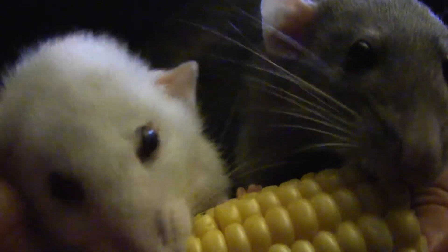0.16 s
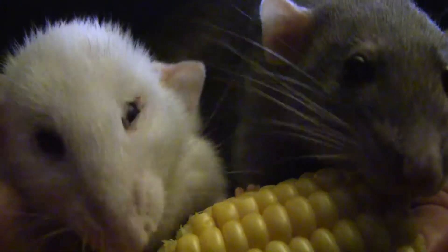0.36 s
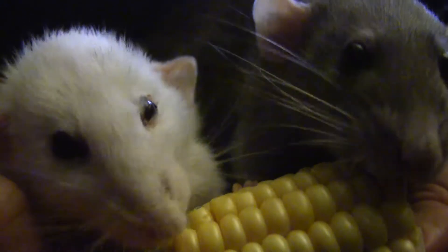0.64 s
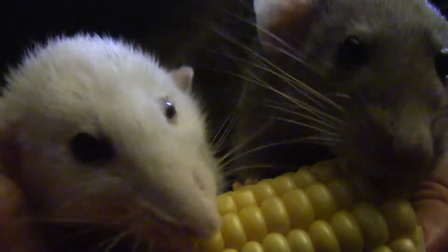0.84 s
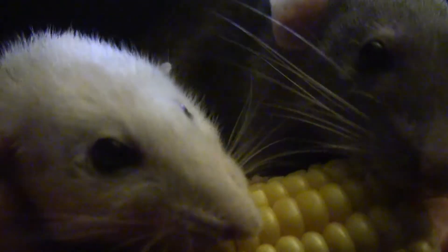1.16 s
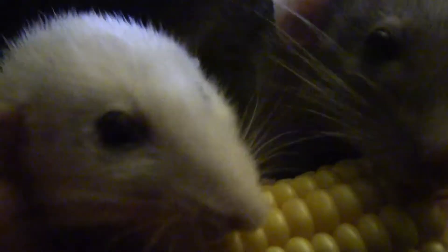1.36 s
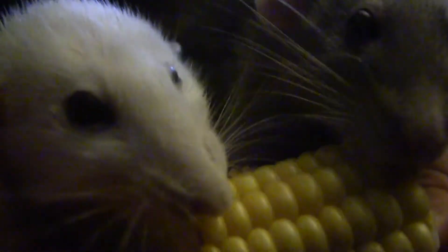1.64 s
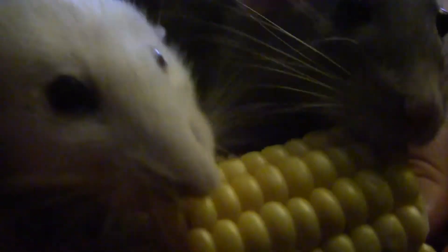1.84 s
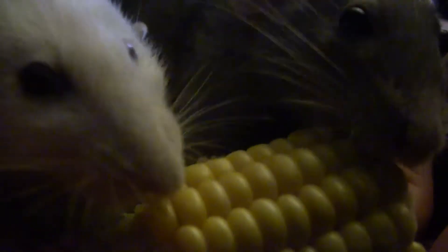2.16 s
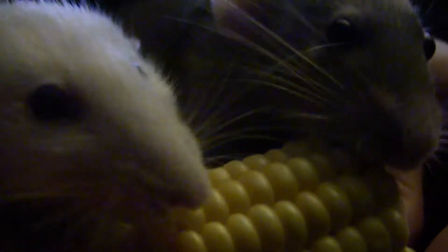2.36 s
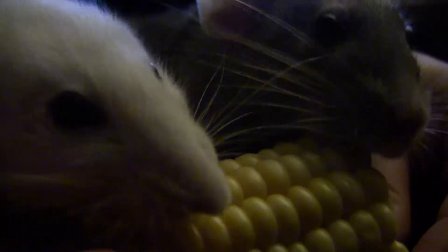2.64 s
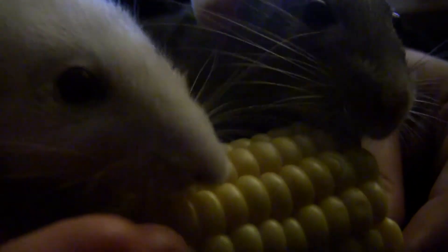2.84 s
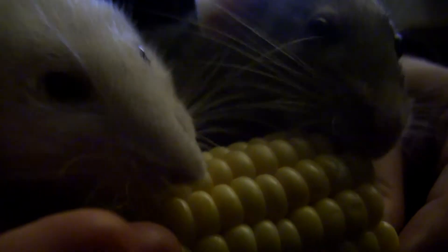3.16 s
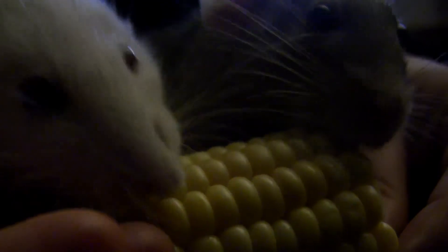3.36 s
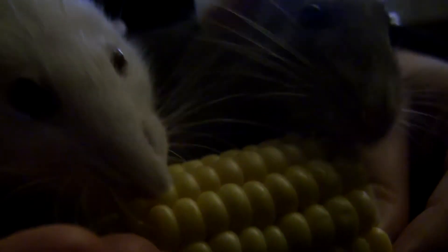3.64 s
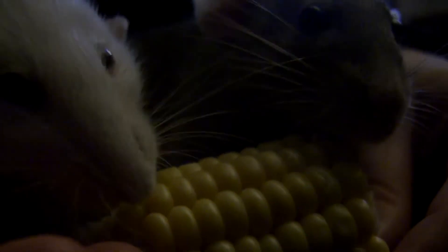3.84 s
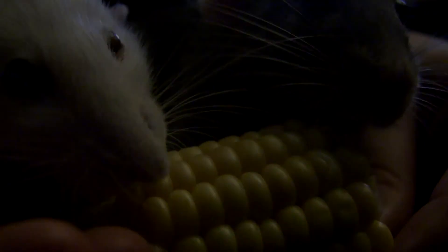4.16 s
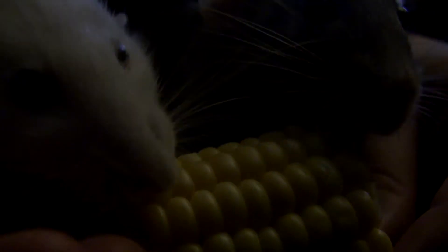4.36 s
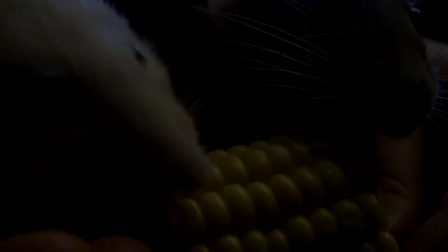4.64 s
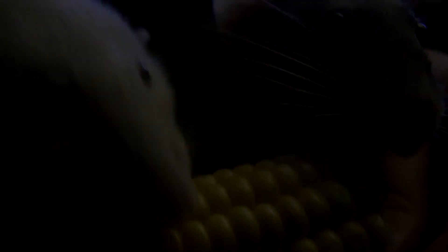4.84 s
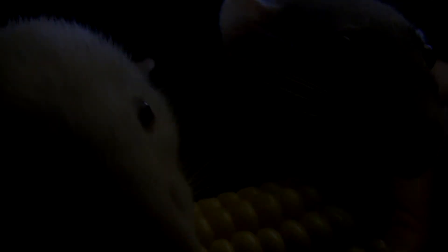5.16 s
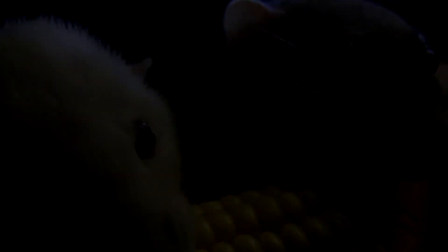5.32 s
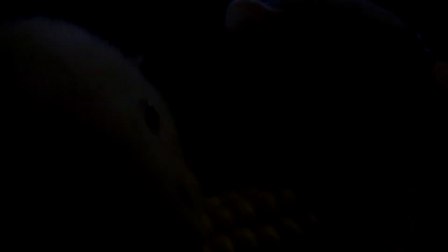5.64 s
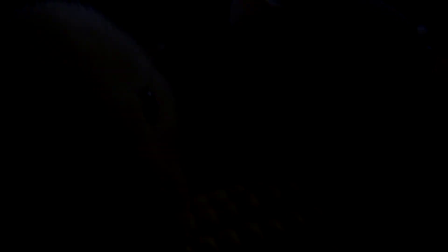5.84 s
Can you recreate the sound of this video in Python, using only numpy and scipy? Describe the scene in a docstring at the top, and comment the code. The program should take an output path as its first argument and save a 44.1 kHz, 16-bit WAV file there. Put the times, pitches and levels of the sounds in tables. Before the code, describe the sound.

Extreme close-up gnawing: brittle ticks of incisors through kernel skins, some over a dull little crack, mixed with moist crunches and tiny falling pops. Lighter nips patter underneath. Busy for about three seconds, then looser and quieter. A short, soft, sinking rub passes near the end. Very dry small-room sound with faint hum and background noise that fade away.

```python
"""Two rats gnawing a corn cob

Two rats gnaw kernels off a hand-held corn cob, close to the microphone in a quiet room.
Incisors snap through skins (short rings over a dull crack) and bites tear pulp in bursts of tiny clicks.
Juice pops as falling sines; fine nibbling (a fizz of clicks) and random lighter nips run underneath.
Near the end something soft brushes past as a sinking noise band under a wide hiss; the mains hums faintly as a sine.
"""
import sys
import numpy as np
from scipy import signal
from scipy.fft import rfft, irfft
from scipy.io import wavfile

SR = 44100
rng = np.random.default_rng(int(sys.argv[2]) if len(sys.argv) > 2 else 0)


def int16_out(signal):
    """Quantize to a 16-bit WAV file."""
    q = np.round(np.clip(np.atleast_2d(signal).T, -1, 1) * 32767)
    wavfile.write(sys.argv[1], SR, q.astype(np.int16))


N = 263938
GRAIN_HZ = np.geomspace(700, 14500, 22)   # the pitches that the crackle is built from


def from_db(db):
    """Decibels to an amplitude factor."""
    return 10 ** (np.asarray(db) / 20)


def rms_one(x):
    """Scales a sound to rms 1."""
    return x / np.sqrt(np.mean(x ** 2) + 1e-20)


def in_time(rows):
    """One curve per column, joined by straight lines."""
    s, *columns = np.transpose(rows)
    return [np.interp(np.arange(N) / SR, s, c) for c in columns]


def at_hz(points, hz):
    """Reads a spectrum on a log-frequency axis."""
    points_hz, points_db = np.transpose(points)
    return np.interp(np.log(hz + 1e-9), np.log(points_hz), points_db)


def add(track, s, sound):
    """Mixes a short sound in at time s."""
    at = int(np.clip(round(s * SR), 0, N - 1))
    track[..., at:at + sound.shape[-1]] += sound[..., :N - at]


def cut(x, hz, kind, order):
    """Butterworth high- or low-pass."""
    sos = signal.butter(order, min(hz, SR / 2 - 1000), kind, fs=SR, output="sos")
    return signal.sosfilt(sos, x)


def resonate(x, hz, width_hz):
    """One resonance, gain about 1 on top."""
    r = np.exp(-np.pi * width_hz / SR)   # pole radius
    zeros = np.array([1, 0, -1]) * (1 - r * r) / 2
    poles = [1, -(1 + r * r) * np.cos(2 * np.pi * hz / SR), r * r]
    return signal.lfilter(zeros, poles, x + 1e-18)


def panned(x, pan_db):
    """Left is louder than right by pan_db."""
    return x * from_db(np.array([[.5], [-.5]]) * pan_db)


def drift(hz):
    """Slow chance that changes up to about hz times a second; spread about 1, held within 2."""
    return np.clip(rms_one(cut(rng.standard_normal(N), hz, "low", order=2)), -2, 2)


def wander(depth_db, hz):
    """An uneven gain that changes up to about hz times a second."""
    return from_db(depth_db * drift(hz))


def coloured_noise(spectrum, side_db):
    """Stereo noise of a given spectrum; the middle has rms about 1."""
    gain = from_db(at_hz(spectrum, np.arange(N // 2 + 1) * SR / N))
    mid, side = rms_one(irfft(rfft(rng.standard_normal((2, N))) * gain, N))
    return mid + from_db(side_db) * side * [[1], [-1]]


# Mains hum: t/s, level/dB (rms, before it wavers)
HUM_LEVEL = [(0, -57.5), (2.2, -59), (4, -63), (6, -73)]


def mains_hum(hum_hz=119.9):
    """Mains hum is one steady tone, here with an unsteady level."""
    level = from_db(in_time(HUM_LEVEL)[0]) * wander(2.5, 5)
    return level * np.sqrt(2) * np.sin(2 * np.pi * hum_hz * np.arange(N) / SR)


# Colour of the background noise: f/Hz, level/dB (per Hz, relative)
NOISE_COLOUR = [(25, -17), (70, -16.5), (140, -3), (260, 0), (450, 1.5), (750, 0), (1100, -5), (2000, -6),
                (5000, -3), (16000, -16)]


def background_noise(noise_db):
    """The faint background is wide, coloured noise whose level wavers."""
    noise = panned(coloured_noise(NOISE_COLOUR, side_db=-1.5), pan_db=-2.5)
    return from_db(noise_db + 2.5) * wander(3.0, 25.0) * noise


def reflections(x, level_db, t60_s, size=8192):
    """Diffuse scatter that dies away, different at each ear."""
    tail = rng.standard_normal((2, size)) * from_db(-60 * np.arange(size) / SR / t60_s)
    tail /= np.linalg.norm(tail, axis=1, keepdims=True)
    return from_db(level_db) * signal.oaconvolve(x, tail, axes=1)[:, :N]


# Hollow between cob, hands and muzzles: f/Hz (centre, before the heads move), width/Hz, level/dB
HOLLOW = [(2735, 540, -0.5), (4290, 600, 2), (6850, 590, -3), (10450, 3200, -5.5)]


def hollow(x, low_hz, top_hz, shift_octaves, shift_hz):
    """The space round the muzzles lifts broad resonances that shift with the heads; fur dulls the top."""
    pose = np.clip(drift(shift_hz), -1, 1)
    lifted = np.zeros_like(x)
    for k in (-1, 0, 1):   # crossfade between three head poses
        posed = x * np.maximum(1 - np.abs(pose - k), 0)
        for hz, width_hz, db in HOLLOW:
            lifted += from_db(db) * resonate(posed, hz * 2 ** (k * shift_octaves), width_hz)
    return cut(cut(x + lifted, low_hz, "high", order=2), top_hz, "low", order=3)


def smear(x, hz, width_hz):
    """An all-pass: partials around hz arrive a little late, which spreads each click."""
    return x - 2 * resonate(x, hz, width_hz)


# The brush swells, sags and lifts off
BRUSH_AT_S, BRUSH_LENGTH_S, BRUSH_DB = 5.589, 0.072, -38.5
BRUSH_EDGE_DB_PER_S, BRUSH_SAG_DB_PER_S = 900, 173
# Its rub is a sinking band of noise with a slightly louder, wide hiss over it
RUB_FIRST_HZ, RUB_LAST_HZ, RUB_SPREAD_HZ, BRUSH_HISS_DB = 385, 185, 99, 1.5
# Colour of the brush hiss: f/Hz, level/dB (per Hz, relative)
BRUSH = [(70, -26), (140, -11), (600, 2), (1200, -5), (6000, -19)]


def brushing():
    """Something soft lands on the cob, loses pressure and lifts off; its rub sinks in pitch as it slows."""
    t = np.arange(N) / SR - BRUSH_AT_S
    sliding_s = np.clip(t, 0, BRUSH_LENGTH_S)
    outside_s = np.abs(t - sliding_s)
    db = BRUSH_DB - BRUSH_SAG_DB_PER_S * sliding_s - BRUSH_EDGE_DB_PER_S * outside_s
    hz = RUB_FIRST_HZ * (RUB_LAST_HZ / RUB_FIRST_HZ) ** (sliding_s / BRUSH_LENGTH_S)
    turn = 2 * np.pi * np.cumsum(hz) / SR
    # slow noise on both phases makes a noise band around the sinking pitch
    band = drift(RUB_SPREAD_HZ) * np.cos(turn) + drift(RUB_SPREAD_HZ) * np.sin(turn)
    rub = rms_one(cut(band, RUB_LAST_HZ, "high", order=2))
    return from_db(db) * (rub + from_db(BRUSH_HISS_DB) * coloured_noise(BRUSH, side_db=-7))


def kernel(x, hz, width_hz, edge_hz):
    """Tooth and kernel ring briefly, and are too small to radiate low notes."""
    return cut(resonate(x, hz, width_hz), edge_hz, "high", order=3)


def fractures(per_s, spread_db, scatter_db):
    """Cell walls break at random: many small clicks, a few large, each from its own direction."""
    when, strength, sign, side = rng.random((int(per_s * N / SR) + 1, 4)).T
    size = from_db(-spread_db * np.log(0.017 + strength)) * np.sign(sign - .5)
    clicks = np.zeros((2, N))
    clicks[:, (when * N).astype(int)] = panned(size, scatter_db * (2 * side - 1))
    return clicks


def grains(hz, per_s, spread_db):
    """The fractures of one pitch, each a tick of a few cycles; rms 1."""
    clicks = fractures(per_s / len(GRAIN_HZ), spread_db, scatter_db=-2.5)
    return rms_one(kernel(clicks, hz, 0.22 * hz, 0.57 * hz))


# Fizz of wet pulp: f/Hz, level/dB (per Hz, relative)
PULP = [(700, -11), (1400, -8.5), (2800, -3.5), (4300, -1.75), (7000, 0.5), (11000, -1.5), (14500, 0.5)]


def shares(colour_db):
    """How the crackle is shared among the grain pitches; unit power in all."""
    gain = from_db(at_hz(PULP, GRAIN_HZ) + colour_db) * np.sqrt(GRAIN_HZ)
    return gain / np.linalg.norm(gain)


def nibbling(level_db, flutter_db, flutter_hz, tilt_db):
    """Small, uneven jaw movements keep up a wet fizz with stray ticks in it."""
    fizz = np.zeros((2, N))
    for share, hz in zip(shares(tilt_db * np.log2(GRAIN_HZ)), GRAIN_HZ):
        dense = from_db(-3.5) * grains(hz, per_s=14000, spread_db=2.0)
        stray = from_db(-5.5) * grains(hz, per_s=260, spread_db=5.0)
        fizz += share * (dense + stray)
    return from_db(level_db) * wander(flutter_db, flutter_hz) * fizz


# Lighter nips: rate, level relative to the nibbling, scatter of level, range and width of the ring
NIPS_PER_S, NIP_DB, NIP_SPREAD_DB = 28, 19.5, 4.5
NIP_LOW_HZ, NIP_HIGH_HZ, NIP_WIDTH_HZ = 4040, 13300, 5100


def nips(nibble_db, size=160):
    """Rows of lighter snaps at random moments; their strength follows the nibbling."""
    wait, strength, pitch = rng.random((size, 3)).T
    s = np.cumsum(-np.log(1 - wait)) / NIPS_PER_S
    followed_db = np.interp(s * SR, np.arange(N), nibble_db)
    db = followed_db + NIP_DB + NIP_SPREAD_DB * (2 * strength - 1)
    hz = NIP_LOW_HZ * (NIP_HIGH_HZ / NIP_LOW_HZ) ** pitch
    rows = np.column_stack([s, db, hz, np.full(size, NIP_WIDTH_HZ), hz / 2])
    return rows[s < N / SR]


# Wet pops that fall in pitch: t/s, level/dB (relative), first f/Hz, last f/Hz, length/s
POPS = [(0.168, -21.5, 2170, 1450, 0.008), (0.849, -27, 3960, 2160, 0.0043),
        (0.967, -29.5, 2560, 1465, 0.0069), (1.358, -28, 3200, 800, 0.0033),
        (2.513, -28, 2490, 1120, 0.0051), (3.4136, -12.5, 2200, 1250, 0.0019),
        (3.4154, -11.5, 820, 358, 0.0031), (3.554, -20.5, 2850, 1000, 0.0015),
        (3.613, -21, 2500, 514, 0.0012), (3.7122, -30, 560, 480, 0.0069), (3.891, -28, 2450, 610, 0.0033),
        (4.003, -38.5, 1510, 446, 0.007), (4.579, -26, 2240, 905, 0.0027), (4.779, -21, 3400, 1280, 0.0022),
        (5.908, -32, 2870, 2200, 0.0011)]


def pops(glide_s, attack_s, rough, low_hz, pan_db, size=1500):
    """A wet seal breaks and the opening pocket rings, its pitch dropping at once."""
    out, t = np.zeros(N), np.arange(size) / SR
    for s, db, first_hz, last_hz, length_s in POPS:
        hz = last_hz * (first_hz / last_hz) ** np.exp(-t / glide_s)
        shape = (1 - np.exp(-t / attack_s)) * np.exp(-(t / length_s) ** 2)
        # the wet film flutters as it parts
        flutter = rms_one(cut(rng.standard_normal(size), 1460, "low", order=2))
        shape = shape * (1 + rough * flutter)
        add(out, s, from_db(db) * shape * np.sin(2 * np.pi * np.cumsum(hz) / SR))
    return panned(cut(out, low_hz, "high", order=2), pan_db)


# Bites tearing the pulp, timed at the hardest push:
# t/s, build-up/s, easing/s, level/dB (relative), ring f/Hz, tilt/dB per octave
BITES = [(0.027, 0.024, 0.0028, -23, 9300, -2), (0.168, 0.0029, 0.026, -31.5, 14000, -4.5),
         (0.391, 0.076, 0.013, -32.5, 3340, 5), (0.547, 0.0063, 0.0035, -20.5, 3900, 5.5),
         (0.619, 0.006, 0.1, -23.5, 4630, 4), (0.697, 0.0045, 0.022, -31.5, 12200, -4.5),
         (0.811, 0.031, 0.026, -26, 4160, 2.5), (0.903, 0.003, 0.0053, -27, 10500, -3),
         (1.131, 0.027, 0.045, -23, 8000, -0.5), (1.21, 0.014, 0.0034, -19.5, 3340, 1.5),
         (1.271, 0.017, 0.05, -30.5, 3500, 3), (1.312, 0.0029, 0.021, -17.5, 11600, 0.5),
         (1.445, 0.003, 0.016, -32, 5000, 0), (1.484, 0.007, 0.015, -26.5, 13600, -3),
         (1.525, 0.006, 0.007, -31.5, 3300, 0), (1.652, 0.0054, 0.012, -27, 12300, -2),
         (1.722, 0.0087, 0.0037, -26.5, 10800, 7), (1.891, 0.017, 0.0057, -26, 6400, -1),
         (2.079, 0.032, 0.0085, -25, 4300, 0), (2.149, 0.016, 0.0048, -27, 8200, 7),
         (2.263, 0.041, 0.023, -29, 6400, 3.5), (2.335, 0.0078, 0.0033, -19, 2400, 9),
         (2.449, 0.014, 0.0047, -18, 5100, 2), (2.473, 0.0067, 0.0041, -19, 4900, 3),
         (2.71, 0.002, 0.028, -25.0, 11500, -0.5), (2.791, 0.0076, 0.0037, -26.5, 8900, -2),
         (2.995, 0.008, 0.024, -23.5, 2600, 3.5), (3.1, 0.072, 0.005, -25.5, 2750, 2.5),
         (3.137, 0.015, 0.0092, -23, 12000, 0), (3.335, 0.027, 0.012, -35, 11400, -5),
         (3.405, 0.02, 0.041, -34.5, 10100, -3), (3.621, 0.022, 0.0084, -34.5, 10400, -3),
         (3.762, 0.0029, 0.017, -22, 6070, -0.5), (3.893, 0.0035, 0.0029, -24, 2000, -0.5),
         (4.038, 0.01, 0.015, -23.5, 5750, -1), (4.108, 0.002, 0.0076, -24, 11800, 1.5),
         (4.215, 0.022, 0.045, -30.5, 4060, -0.5), (4.335, 0.024, 0.016, -33, 4200, 3),
         (4.401, 0.021, 0.003, -30, 9100, -3), (4.497, 0.042, 0.022, -31, 4170, 0),
         (4.579, 0.008, 0.0017, -28.5, 2700, -5.5), (4.609, 0.015, 0.016, -28.5, 2800, 3),
         (4.677, 0.022, 0.0079, -33, 4030, -1), (4.809, 0.025, 0.0063, -31.5, 9500, -2),
         (4.836, 0.0012, 0.063, -35, 5100, 4), (4.976, 0.038, 0.003, -32.5, 1950, 0),
         (5.046, 0.0094, 0.012, -33, 3920, 2), (5.117, 0.011, 0.0023, -23, 7900, 0.5),
         (5.134, 0.0046, 0.0063, -25, 3020, 1), (5.263, 0.041, 0.0051, -31.5, 4050, 4.5),
         (5.352, 0.006, 0.026, -31.5, 7650, 1.5), (5.411, 0.021, 0.0093, -33, 6550, 2.5),
         (5.446, 0.01, 0.0062, -34, 7600, 0), (5.492, 0.005, 0.024, -28.5, 4700, 10.5),
         (5.624, 0.04, 0.013, -28.5, 2280, 0.5), (5.782, 0.004, 0.018, -33.5, 3180, 3),
         (5.971, 0.019, 0.01, -29, 9300, 1.5)]


def bites(level_db, judder_db, judder_hz, ring_db, ring_octaves, size=16384):
    """The push builds until the pulp gives, then eases; each bite crackles around a pitch of its own."""
    power, t = np.zeros((len(GRAIN_HZ), N)), np.arange(size) / SR
    for s, build_s, ease_s, db, hz, tilt_db in BITES:
        start = max(s - 3 * build_s, 0)
        since = t + start - s
        push = np.exp(-np.where(since < 0, (since / build_s) ** 2, since / ease_s))
        octaves = np.log2(GRAIN_HZ / hz)
        colour_db = tilt_db * octaves + ring_db * np.exp(-(octaves / ring_octaves) ** 2)
        add(power, start, np.outer(shares(colour_db) ** 2, (from_db(db + level_db) * push) ** 2))
    tearing = np.zeros((2, N))
    for grain_power, hz in zip(power, GRAIN_HZ):
        tearing += np.sqrt(grain_power) * grains(hz, per_s=3400, spread_db=2.5)
    # the teeth stick and slip, so fractures come in clumps
    return wander(judder_db, judder_hz) * tearing


# The dull crack under a snap weakens as the low edge of its ring rises
CRACK_LOSS_DB_PER_OCTAVE = 5.5


def snap(hz, width_hz, edge_hz, follow_db, follow_s, crack_db, crack_s, crack_low_hz, crack_high_hz,
         size=512, count=3):
    """A sharp release of unit energy runs on in weaker steps; a deeper tooth (lower edge) cracks more."""
    release = signal.unit_impulse(size)
    steps = np.clip(follow_s * SR * rng.uniform(0.091, 1, count), 1, size - 1).astype(int)
    release[steps] += from_db(follow_db) * rng.choice([-1, 1], count)
    split = rng.standard_normal(size) * np.exp(-np.arange(size) / SR / crack_s)
    crack = cut(cut(split, crack_low_hz, "high", order=2), crack_high_hz, "low", order=2)
    body = from_db(crack_db - CRACK_LOSS_DB_PER_OCTAVE * np.log2(edge_hz / crack_low_hz))
    tick = rms_one(kernel(release, hz, width_hz, edge_hz)) + body * rms_one(crack)
    return tick / np.linalg.norm(tick)


# Teeth snapping through skin: t/s, level/dB (energy, relative), ring f/Hz, ring width/Hz, low edge f/Hz
SNAPS = [(0.0242, -4, 6800, 3600, 700), (0.0717, 0, 7000, 2100, 6500), (0.0738, 3, 6100, 1200, 8100),
         (0.0897, -5, 11100, 8200, 1000), (0.1108, 2, 4560, 1400, 6300), (0.1207, 3.5, 13600, 7100, 1300),
         (0.1549, 0.5, 4400, 5000, 4200), (0.1641, 3, 6450, 2100, 1400), (0.215, -2.5, 12500, 2000, 7300),
         (0.2836, -1, 6570, 9900, 800), (0.3516, -5.5, 3820, 700, 4750), (0.3746, 3.5, 5900, 2800, 8100),
         (0.5458, -6, 4030, 2700, 700), (0.6272, 2, 5070, 450, 4500), (0.6476, 3, 4400, 5400, 4530),
         (0.7164, -12, 4800, 6000, 3200), (0.7361, -2, 9000, 9900, 700), (0.7468, -1, 6830, 9900, 700),
         (0.7838, 4.5, 3920, 1310, 5700), (0.7898, 4, 5100, 5600, 3800), (0.885, -9, 5200, 1480, 4000),
         (0.9205, -1, 6250, 1400, 3400), (0.9427, 0, 11800, 2600, 700), (0.9913, -4, 6560, 1800, 700),
         (1.0768, 0, 4630, 2800, 1200), (1.1273, -2, 8050, 1500, 2500), (1.1302, 3, 8150, 1900, 6000),
         (1.2119, -2.5, 2300, 900, 1200), (1.2402, -4.5, 5900, 3100, 6400),
         (1.2657, -2.5, 3800, 5000, 1900), (1.2961, 3, 14000, 5700, 700), (1.3139, 0.5, 5300, 9900, 4400),
         (1.3158, 5.5, 4300, 6700, 4100), (1.319, -9, 2800, 900, 1800), (1.3426, 4, 14000, 3600, 2400),
         (1.3546, 6, 7200, 5600, 700), (1.368, -7, 4600, 5300, 4300), (1.3778, -5.5, 1500, 3600, 4100),
         (1.3836, -13, 8500, 5000, 3500), (1.447, 1.5, 9700, 1700, 3100), (1.449, 3, 4500, 1800, 5250),
         (1.4618, 0, 5000, 2500, 6600), (1.4865, -3, 1500, 9900, 5200), (1.5222, -3, 5030, 2000, 700),
         (1.5729, -7, 8000, 2000, 6000), (1.5796, 4, 6600, 750, 1200), (1.5891, 3, 14000, 4600, 2400),
         (1.7232, 4, 6840, 700, 2400), (1.7542, 3, 6850, 3900, 3680), (1.7728, 2.5, 12600, 4300, 800),
         (1.8386, -10.5, 6270, 2500, 2000), (1.8865, 2, 7700, 9900, 700), (1.935, -5.5, 5730, 9900, 2820),
         (1.9698, 2.5, 8850, 5900, 3700), (1.9749, -3, 6700, 700, 5200), (1.9972, 3, 13500, 5700, 2800),
         (2.0131, 2.5, 10800, 1200, 1300), (2.0618, -1.5, 8900, 800, 700), (2.0833, 1.5, 13800, 1100, 2200),
         (2.0957, -2, 11000, 2100, 6900), (2.1051, 2, 4700, 2600, 3700), (2.1338, -1.5, 9500, 9900, 1100),
         (2.1871, -1, 12900, 2400, 1900), (2.1933, 4, 6350, 705, 1310), (2.2321, -1.5, 7440, 1600, 4600),
         (2.2436, 2, 14400, 1300, 1000), (2.3331, 3, 6850, 1800, 7700), (2.3796, -6, 5940, 1800, 1800),
         (2.3975, 1.5, 9500, 9900, 2700), (2.4006, 4.5, 3470, 500, 9000), (2.4469, 0.5, 5400, 1100, 700),
         (2.4849, -3, 14000, 9900, 4000), (2.5007, 0, 5460, 1900, 1400), (2.5037, 0.5, 6000, 900, 1300),
         (2.5909, -5, 9700, 4500, 4000), (2.6223, -12, 8000, 2500, 5000), (2.6976, -1.5, 6660, 900, 1000),
         (2.7108, -1, 11400, 2100, 700), (2.7857, 4, 12100, 2800, 700), (2.8087, -2.5, 5900, 9000, 2100),
         (2.8323, -1, 12100, 4300, 800), (2.8523, -2, 9800, 1300, 3100), (2.8653, 5.5, 12700, 8200, 810),
         (2.8905, 0, 7250, 8200, 2200), (2.9139, 3, 8200, 800, 2700), (3.008, -1.5, 7900, 2200, 1400),
         (3.2122, -10, 11800, 2500, 8000), (3.2193, -7.5, 10380, 4900, 1600),
         (3.2596, -6, 9600, 3900, 8800), (3.2713, -1, 12000, 3800, 7600), (3.3049, -5.5, 8000, 2700, 2400),
         (3.3182, -3, 7700, 2800, 2500), (3.4142, -3, 1510, 3100, 700), (3.4261, 3.5, 8400, 8800, 2100),
         (3.4372, -1.5, 4050, 2700, 2600), (3.4529, -10, 4200, 700, 3000), (3.4924, -1, 12300, 2000, 1500),
         (3.4951, 0, 11800, 2400, 8900), (3.5273, -2.5, 6230, 3300, 1600), (3.5553, -2.5, 3100, 6000, 700),
         (3.6119, 3.0, 10800, 2300, 700), (3.6896, -10.5, 5570, 2500, 2500), (3.763, 0, 9400, 2700, 3600),
         (3.8888, 0.5, 8400, 2400, 700), (3.9285, 1.5, 8800, 2000, 7000), (3.9974, 1, 11700, 2500, 1500),
         (4.0303, -2, 2700, 7300, 3900), (4.0339, -7, 5500, 3600, 700), (4.0685, 0.5, 8200, 9900, 700),
         (4.1106, -6, 11900, 1800, 700), (4.1242, -6.5, 9200, 1400, 700), (4.1887, -10, 3900, 2500, 2000),
         (4.2915, -3, 8900, 1400, 700), (4.3009, -3.5, 11100, 2700, 6100), (4.3329, -4.5, 7400, 1900, 700),
         (4.4515, -3, 8200, 6400, 700), (4.4655, -3, 4100, 1800, 3000), (4.4812, -8, 11400, 3000, 6000),
         (4.5975, -4, 5600, 7700, 1200), (4.6088, -5, 11700, 2000, 3500), (4.6141, 0.5, 8260, 9900, 700),
         (4.8284, -7.0, 8200, 2100, 1100), (4.8661, -4, 13200, 6000, 700), (4.9037, -2.5, 9000, 2400, 700),
         (4.9176, 3, 10400, 1100, 3000), (4.9429, -3, 6200, 4100, 700), (5.0073, -6.5, 8100, 9900, 2600),
         (5.0908, -9, 10700, 1510, 1300), (5.1312, -3.5, 6700, 9900, 700), (5.179, -8, 5440, 9900, 1100),
         (5.1972, -9, 7900, 1800, 1300), (5.342, -13, 11600, 5600, 700), (5.36, -7, 4950, 1600, 700),
         (5.4861, -8, 6400, 900, 3400), (5.4937, -1.5, 8400, 4900, 6000), (5.5117, -9, 5400, 2000, 4000),
         (5.5177, -4, 13900, 9900, 2100), (5.6674, -6, 4600, 9600, 5000), (5.7202, -7.5, 7300, 9900, 700),
         (5.7676, -11.5, 7200, 1600, 5500), (5.7854, -5.5, 1500, 10000, 4400),
         (5.8468, -8, 5950, 1500, 4000), (5.8479, -2.5, 10400, 810, 5000)]


def snaps(rows, level_db, scatter_db):
    """Teeth break through the skin; scatter_db spreads the snaps at random between left and right."""
    out = np.zeros((2, N))
    for s, db, hz, width_hz, edge_hz in rows:
        tick = snap(hz, width_hz, edge_hz, follow_db=-8, follow_s=0.00087, crack_db=-18.0,
                    crack_s=0.0012, crack_low_hz=720, crack_high_hz=2550)
        add(out, s, panned(from_db(db + level_db) * tick, scatter_db * rng.standard_normal()))
    return out


# Floor under the bites: t/s, fine nibbling level/dB, background noise level/dB (both relative)
QUIET = [(0.0, -35.5, -44), (0.5, -37.5, -46.5), (1.2, -33, -44.5), (1.7, -36.5, -43), (2.4, -37, -46.5),
         (3.6, -39, -48.5), (4.9, -40, -50.5), (5.4, -45, -57.5), (5.98, -44.5, -64)]


def scene():
    """Chewing close up, scattered by hands and room, over a faint background."""
    nibble_db, noise_db = in_time(QUIET)
    background = background_noise(noise_db) + mains_hum()
    fizz = nibbling(nibble_db, flutter_db=2.84, flutter_hz=34, tilt_db=-1.7)
    light_nips = snaps(nips(nibble_db), level_db=-0.3, scatter_db=5.5)
    juice = pops(glide_s=0.0018, attack_s=0.00064, rough=0.55, low_hz=199, pan_db=-2.0)
    tearing = bites(level_db=0.08, judder_db=2.0, judder_hz=146, ring_db=8.0, ring_octaves=0.39)
    teeth = snaps(SNAPS, level_db=2.0, scatter_db=0.0)
    crunch = hollow(teeth + tearing + fizz + light_nips, low_hz=220, top_hz=14100,
                    shift_octaves=0.064, shift_hz=5.8)
    chewing = panned(smear(crunch, hz=9250, width_hz=6500), pan_db=-0.5) + juice
    hands = reflections(cut(chewing, 2550, "high", order=1), level_db=-9.0, t60_s=0.023)
    walls = reflections(chewing, level_db=-21, t60_s=.15)
    return background + brushing() + walls + hands + chewing


def record(dry):
    """The tallest snaps are rounded off; rumble and the very top are cut."""
    top = 0.94
    rounded = cut(top * np.tanh(dry / top), 27, "high", order=1)
    steep_low_pass = signal.ellip(10, .2, 70, 15900, fs=SR, output="sos")
    return signal.sosfilt(steep_low_pass, rounded)


dry = scene()
out = record(dry)
int16_out(out)
```